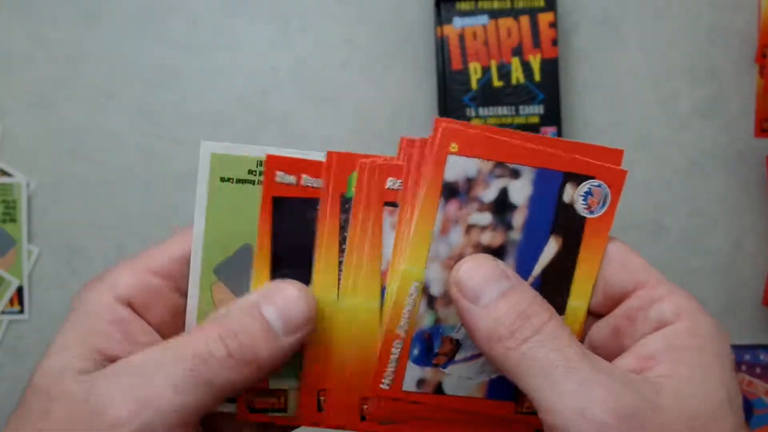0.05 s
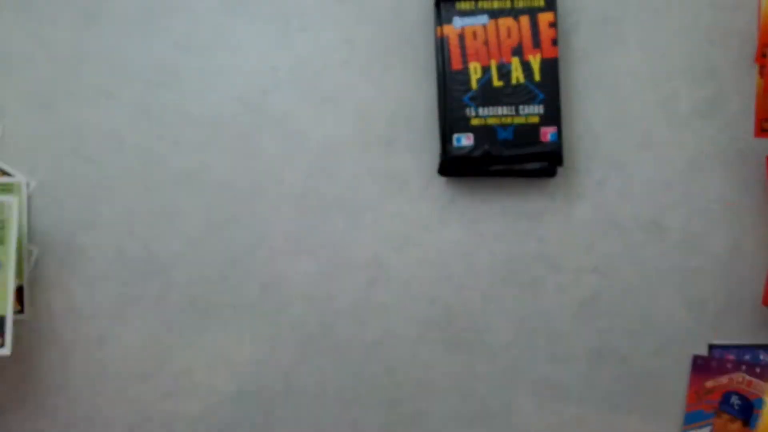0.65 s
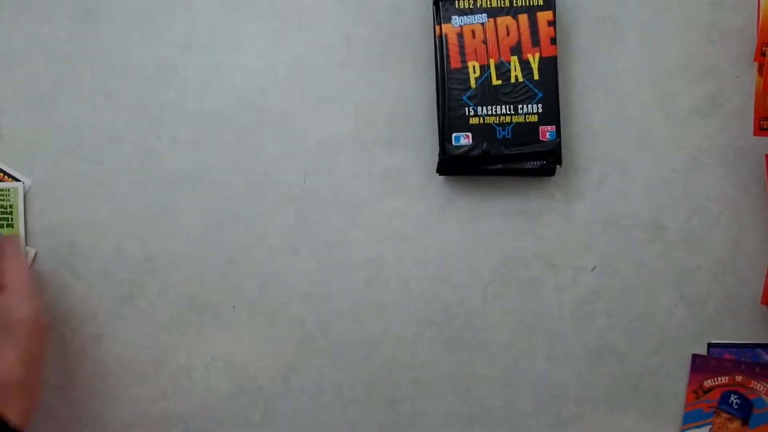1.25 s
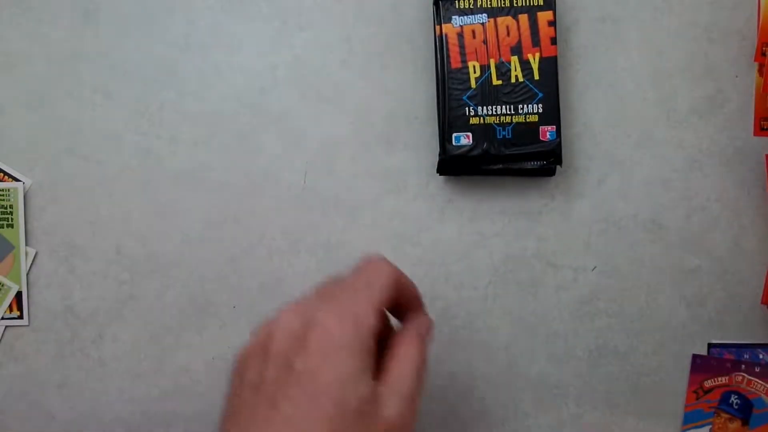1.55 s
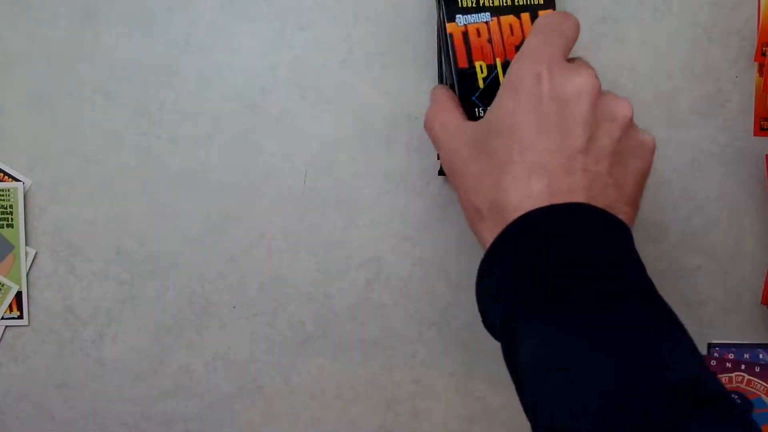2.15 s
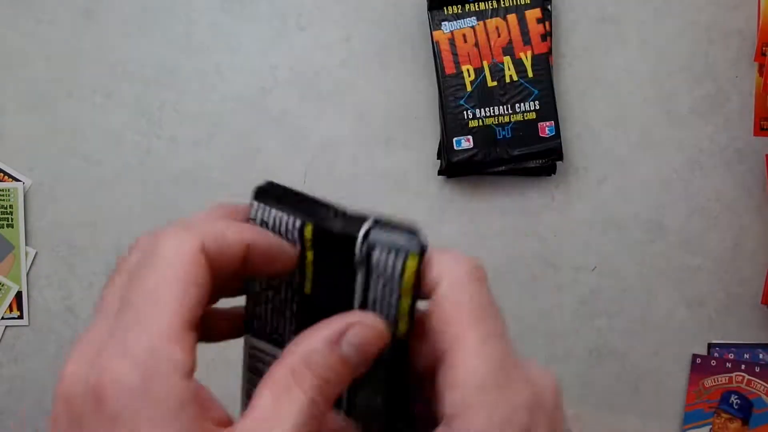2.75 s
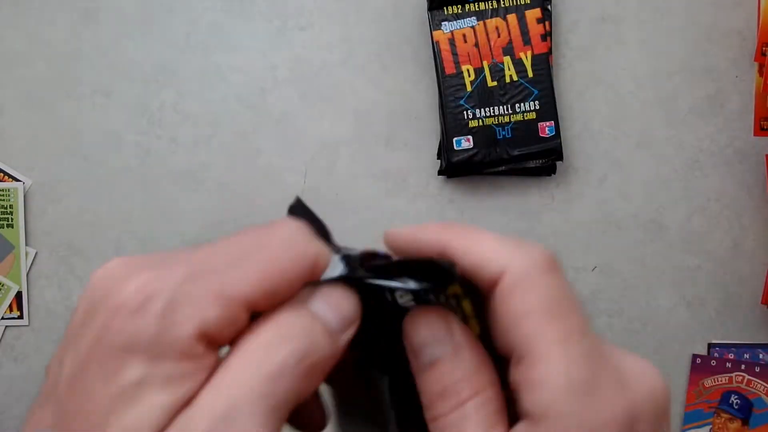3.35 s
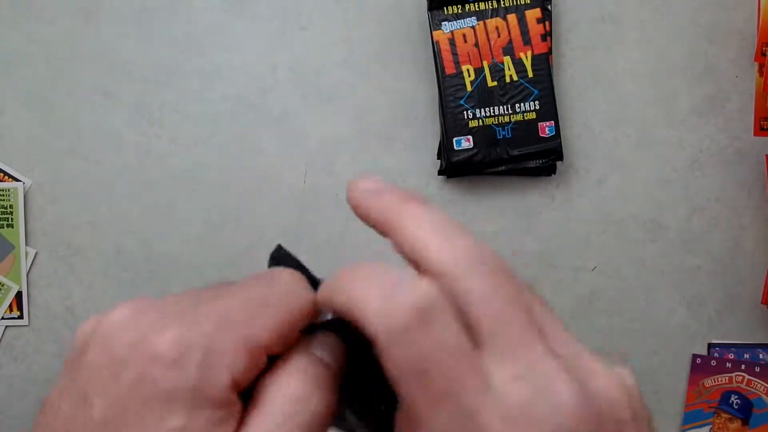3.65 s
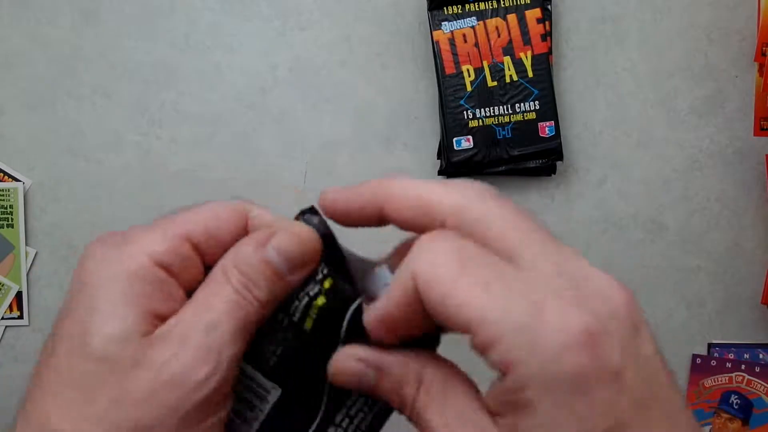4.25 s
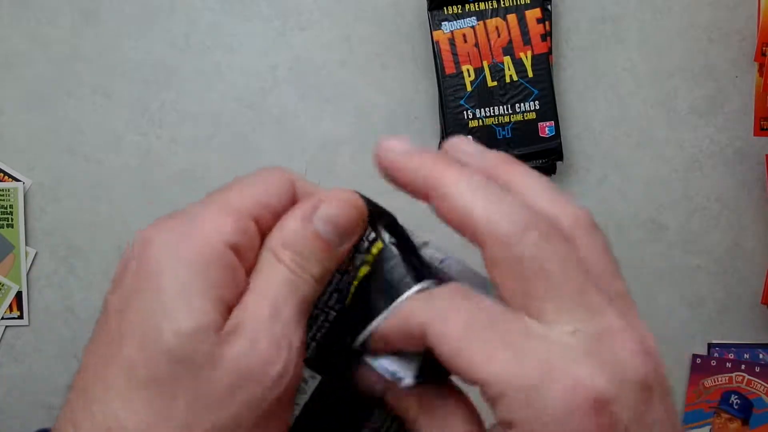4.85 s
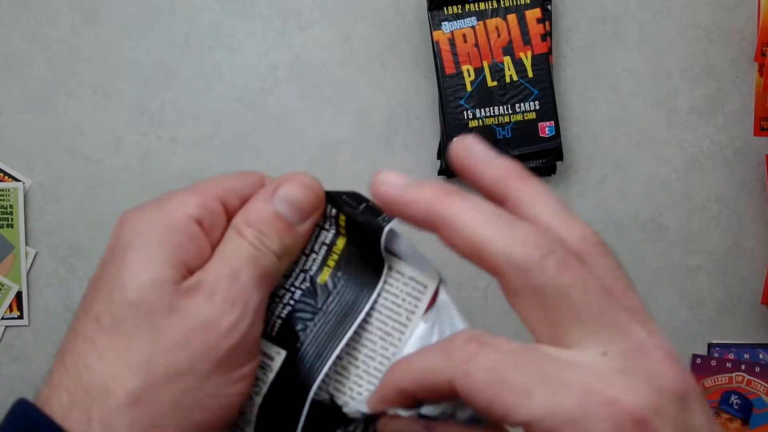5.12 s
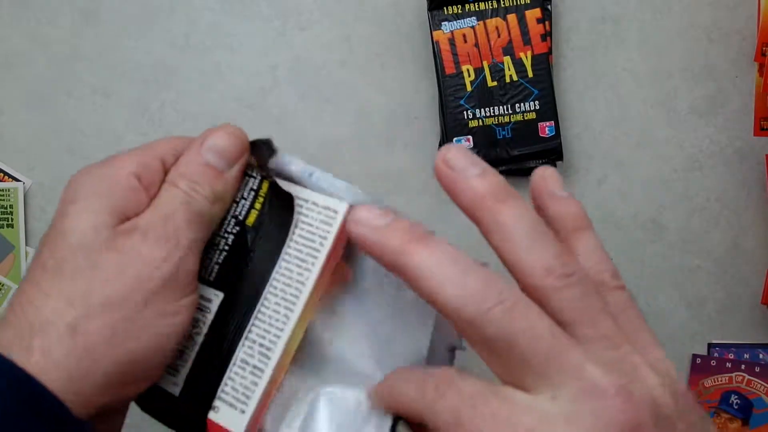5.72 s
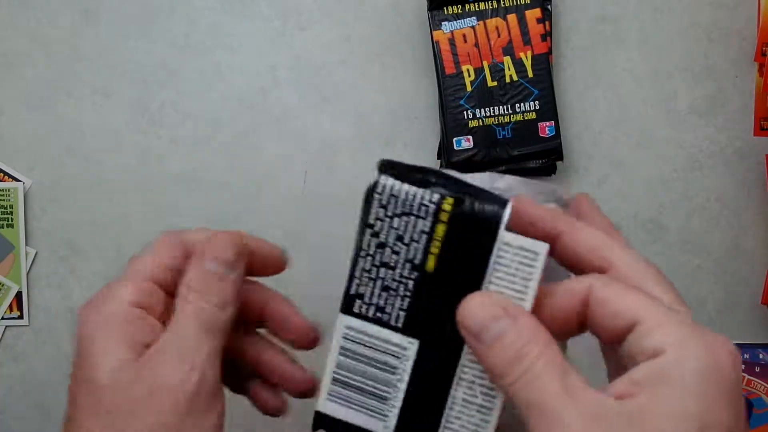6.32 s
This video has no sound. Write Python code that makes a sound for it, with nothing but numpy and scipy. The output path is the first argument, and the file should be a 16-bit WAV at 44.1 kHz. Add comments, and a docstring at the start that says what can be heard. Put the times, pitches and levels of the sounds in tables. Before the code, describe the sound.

Trading cards slide and flick, then a foil pack is peeled open with sharp snaps and crinkling, close by over a faint room hum.

```python
"""First you hear trading cards slide apart in two hands, their edges flicking as they are laid down.
A hand brushes and bumps the table, lightly taps a foil pack, picks it up, pinches it and peels it open.
As it opens, foil creases buckle with sharp snaps over a fine crackle of bending film.
It all happens close by in a small room, over a faint rumble, hiss and low hum."""
import sys
import numpy as np
from scipy import signal
from scipy.fft import rfft, irfft
from scipy.io import wavfile
from scipy.ndimage import uniform_filter1d

SR = 44100
rng = np.random.default_rng(int(sys.argv[2]) if len(sys.argv) > 2 else 0)


def int16_out(signal):
    """Quantize to a 16-bit WAV file."""
    q = np.round(np.clip(np.atleast_2d(signal).T, -1, 1) * 32767)
    wavfile.write(sys.argv[1], SR, q.astype(np.int16))


N = 290178
TIME = np.arange(N) / SR
SIZE = 8192  # samples in one short sound or filter
AGE = np.arange(SIZE) / SR  # seconds since a short sound began
FREQ = np.maximum(np.arange(SIZE // 2 + 1) * SR / SIZE, 1)
BODY_HZ, TREBLE_HZ = 1480, 6010  # "body" lies below the first, "treble" above the second

# how strongly a thin sheet of foil or card sounds at each pitch: pitch_hz, level_db
SHEET_TONE = [(71, -35.5), (120, -10.5), (226, -15.5), (409, -4), (501, -4), (769, -3), (1230, -7),
              (1360, -8), (1780, -4.5), (3020, -3.5), (9290, -5.5), (14900, -3.5), (15800, -10.5)]


def wrapper(low_hz=480):
    """A finger taps the pack lightly; then creases crackle and snap as the foil bends and peels open."""
    # each pull on the foil: start_s, swell_s, fade_s, level_db, body_db, treble_db
    pulls = [(2.531, 0.017, 0.034, -41, -16, 5), (2.75, 0.022, 0.095, -46.5, 4, -1),
             (2.82, 0.022, 0.011, -31, 3.5, 0.5), (2.892, 0.023, 0.034, -28.5, -16, -10.5),
             (3.04, 0.011, 0.084, -38.5, -9, 3), (3.15, 0.063, 0.036, -33, -4.5, -5),
             (3.24, 0.041, 0.024, -34, 4, 7), (3.32, 0.072, 0.1, -31, 1, 1.5),
             (3.45, 0.036, 0.023, -28, -1.5, -0.5), (3.62, 0.097, 0.11, -46.5, -2, -4),
             (3.71, 0.052, 0.085, -44.5, 0, -0.5), (4.16, 0.024, 0.1, -40, -2, -4),
             (4.231, 0.064, 0.13, -28.5, -1, 2), (4.329, 0.072, 0.039, -25.5, 0.5, -3.5),
             (4.658, 0.11, 0.19, -36.5, -6.5, -1.5), (4.76, 0.082, 0.075, -33.5, 5, 2),
             (4.92, 0.06, .08, -34, -6, -1), (4.98, 0.068, 0.076, -22.5, -1.5, -4.5),
             (5.06, 0.021, 0.016, -28, 2, 12), (5.15, .05, 0.19, -42.5, -4, -1.5),
             (5.255, .02, .13, -32, 6.5, 1.5), (5.33, 0.051, 0.06, -32, -4.5, -8),
             (5.391, 0.072, 0.092, -27, -3, -5.5), (5.46, 0.044, 0.13, -24, -4, -8),
             (5.52, 0.076, 0.034, -18, 2.5, 3), (5.685, 0.057, 0.091, -39.5, -0.5, -4),
             (5.759, 0.056, 0.11, -33, -3, -1), (5.85, 0.081, 0.05, -45, 7, 5),
             (5.99, 0.079, 0.3, -41, 0, -0.5), (6.07, 0.03, 0.15, -39.5, -4, 6),
             (6.15, 0.084, 0.027, -35.5, -3.5, -7), (6.302, 0.061, 0.0067, -37.5, 1, 1),
             (6.488, 0.032, 0.14, -37.5, -5, -1.5)]
    # two light finger taps on the pack, then foil creases snapping:
    # start_s, level_db, pitch_hz, treble_db, crack_share (0-1)
    taps_and_snaps = [(1.93, -50.5, 3970, -15, 0.1), (1.975, -50, 2960, -3, .2),
                      (2.42, -46.5, 5850, -2.5, 0.17), (2.551, -25.5, 4160, -1, 0.15),
                      (2.554, -22, 4100, 3, 0.21), (2.574, -30.5, 1280, -8, 0.23),
                      (2.776, -40.5, 1440, -14, 0.22), (2.8347, -23, 4560, 4.5, 0.8),
                      (2.877, -22.5, 7800, -4.5, 0.24), (2.917, -24, 6440, 14, .5),
                      (2.990, -44.5, 3790, -9, 0.6), (3.014, -30.5, 2510, -13, 0.41),
                      (3.046, -27.5, 3100, 11, 0.33), (3.0575, -25, 3300, 2, 0.43),
                      (3.206, -34.5, 2020, -15, 0.2), (3.264, -38, 3770, -1, .3),
                      (3.293, -32.5, 5000, 3, 0.5), (3.3205, -19.5, 3000, 1.5, 0.16),
                      (3.379, -24.5, 4130, 7, 0.26), (3.3883, -20.5, 4300, 4, 0.6),
                      (3.411, -22, 3620, -2.5, 0.46), (3.460, -23.5, 2970, 3, 0),
                      (3.478, -22.5, 3570, -10, 0.88), (3.568, -50.5, 3150, -27, 0.05),
                      (3.6605, -46.5, 4850, -13, .2), (3.689, -31, 2960, -3, .2),
                      (3.779, -40, 3970, 15, 0.2), (3.826, -35.5, 3860, -6, 0.14),
                      (3.837, -35, 3680, -8, 0.16), (3.905, -40, 2800, 4, 0.04),
                      (3.935, -37.5, 2360, -12, 0.08), (3.961, -34.5, 2820, 0, 0.23),
                      (4.0114, -34.5, 5500, -6.5, 0.02), (4.076, -36, 6300, 6.5, .2),
                      (4.138, -45, 2730, -8, 0.03), (4.164, -29.5, 4200, -7, 0.43),
                      (4.1875, -34.5, 2360, -3, 0.2), (4.268, -25.5, 3400, -8, 0.76),
                      (4.279, -22.5, 3320, -24, 0.54), (4.300, -23, 2300, -10, 0.22),
                      (4.3115, -29, 3440, -5, 0), (4.3765, -23.5, 3630, 1, .05),
                      (4.3895, -21.5, 2670, -10, 0.29), (4.401, -26, 2800, -2, .05),
                      (4.434, -20.5, 3730, -5.5, 0.4), (4.528, -35.5, 6200, 5.5, 0.2),
                      (4.581, -38.5, 4500, 3, 0.07), (4.677, -34.5, 3900, 6, 0.02),
                      (4.695, -29.5, 7200, 3, 0.14), (4.719, -31, 4800, -1, 0.4),
                      (4.777, -27.5, 1520, 1, 0), (4.7845, -24, 3500, -6, 0.5),
                      (4.828, -22, 4930, -9, 0.21), (4.875, -23, 4020, -4, 0.42),
                      (4.920, -27.5, 2700, -7.5, 0.2), (4.932, -31.5, 2390, 2, 0.06),
                      (5.005, -19.5, 3440, -12, .2), (5.0257, -25, 3400, -4, 0),
                      (5.042, -15.5, 1950, 4.5, 0.11), (5.079, -21, 3870, 0, 0.17),
                      (5.0897, -17, 1370, -4, 0.21), (5.128, -35, 5700, -1, 0.4),
                      (5.166, -45, 3380, -15, 0.6), (5.215, -36.5, 4130, -15, .3),
                      (5.2593, -23, 4170, -1, 0.22), (5.2657, -24.5, 4200, -18, 0.94),
                      (5.2895, -24.5, 3840, -1.5, 0.05), (5.331, -36, 3270, -10, 0.7),
                      (5.3646, -29.5, 3430, -2, 0.07), (5.398, -19, 2500, 0.5, 0.21),
                      (5.446, -23.5, 2300, -7, 0.2), (5.473, -24.5, 2980, -4, 0.2),
                      (5.556, -21.5, 3060, 0, 0.07), (5.580, -20.5, 1640, -3, 0.07),
                      (5.626, -28.5, 980, -8, 0.17), (5.671, -43, 3500, -3, 0.2),
                      (5.683, -28, 2820, 9, 0.13), (5.700, -35, 830, -20, 0.13),
                      (5.790, -28.5, 4270, 1, 0.11), (5.812, -32.5, 5580, 2, 0.55),
                      (5.831, -31.5, 1970, -17, 0.38), (5.945, -25, 4140, -3, 0.26),
                      (5.997, -25.5, 3160, -6, .4), (6.088, -28.5, 1310, -23, 0.15),
                      (6.201, -30.5, 4500, 6, 0), (6.2256, -27.5, 4280, 6, 0.07),
                      (6.2805, -36, 8060, -7.5, 0.1), (6.356, -17, 4030, 1, 0.32),
                      (6.525, -39, 2510, -5, 0)]
    # the more foil hangs free, the better it gives off low notes: time_s, low_gain_db
    opening = [(2.5, 3.5), (3.6, -5.5), (4.3, -1.5), (4.9, -1), (5.5, -4), (5.85, 13), (6.1, -1),
               (6.58, 6.5)]
    crackle = tiny_slips(per_s=750, spread_db=3, hiss_db=-12.5, crack_share=0.33, ring_db=12.5,
                         ring_width=0.26, overtone_db=4, decay_s=0.097, patches=10)
    foil = rub(colour(crackle, tone_curve(SHEET_TONE) + hollow()), pulls, swell_db=11.5)
    foil += snaps(taps_and_snaps, base_body_db=2, ring_db=7.5, ring_width=0.36, overtone_db=4,
                  decay_s=0.061, room_db=-23, room_s=0.18, creak_db=-8.5, creak_s=0.0015)
    lows = one_side(foil, low_hz, "low")
    return foil + (gain(over_time(opening)) - 1) * lows


def cards():
    """Card faces rub with a fine, dense grain, and their edges flick."""
    # one stack sliding over another: start_s, swell_s, fade_s, level_db, body_db, treble_db
    slides = [(0, 0.077, 0.14, -31, -5, -3), (0.211, 0.057, 0.059, -36.5, 4.5, -4),
              (.29, 0.05, 0.28, -41.5, 3.5, 1), (.42, 0.067, .11, -39, 5, -2), (.55, .03, 0.14, -56, 2, 6),
              (.9, 0.042, .15, -49.5, 3, -1), (.97, .11, 0.023, -36.5, 10.5, -4),
              (1.15, 0.022, 0.07, -48, 16.5, 4)]
    # edges flicking: start_s, level_db, pitch_hz, treble_db, crack_share (0-1)
    flicks = [(.35, -40.5, 4030, -12, 0.03), (.483, -41.5, 1470, -9, 0.04), (.911, -48, 1490, -19, 0),
              (.984, -43.5, 2400, -9, .05), (1.028, -41, 2010, -8, 0.2), (1.05, -31.5, 3400, -12, 0),
              (1.0835, -25.5, 3630, -11, 0.25), (1.0865, -22, 1820, -12, 0.55)]
    # the tone of rubbing card: pitch_hz, level_db
    card_tone = [(88, -34), (150, -18.5), (327, -15.5), (532, -13.5), (587, -9), (883, -13.5),
                 (1160, -20.5), (2900, -1), (3260, -6), (4370, -8), (14900, -7), (15800, -8.5)]
    friction = tiny_slips(per_s=3500, spread_db=4, hiss_db=-0.5, crack_share=0.2, ring_db=14.5,
                          ring_width=0.94, overtone_db=6, decay_s=0.031, patches=8)
    tone = tone_curve(card_tone) + hollow() - 1.5 * peak(pitch_hz=2900, width_hz=700)
    edges = snaps(flicks, base_body_db=-1.5, ring_db=10, ring_width=0.28, overtone_db=2,
                  decay_s=0.058, room_db=-24.5, room_s=0.28, creak_db=-6, creak_s=0.0025)
    return rub(colour(friction, tone), slides, swell_db=18) + edges


def snaps(events, base_body_db, ring_db, ring_width, overtone_db, decay_s, room_db, room_s,
          creak_db, creak_s):
    """Foil or card that is tapped, bent or flicked creaks briefly, then clicks and rings at one pitch."""
    out = np.zeros(N)
    sheet = tone_curve(SHEET_TONE) + hollow()
    body = 1 / (1 + (FREQ / BODY_HZ) ** 4)
    treble = 1 / (1 + (TREBLE_HZ / FREQ) ** 4)
    noises = rng.standard_normal((len(events), 2, SIZE))
    for (start_s, level_db, pitch_hz, treble_db, crack_share), (noise, strain) in zip(events, noises):
        # big, low patches that give way softly have the most body; small sharp ones have almost none
        body_db = base_body_db + 2.5 * np.log2(3360 / pitch_hz) - 33 * crack_share
        ring = ring_db * peak(pitch_hz, ring_width * pitch_hz) + overtones(overtone_db) * (1 - body)
        tone = sheet + body_db * body + treble_db * treble + ring
        snap = colour(crack(noise, crack_share, decay_s, room_db, room_s), tone)
        creak = normalise(colour(strain, tone)) * np.exp(-AGE[::-1] / creak_s)
        add(out, start_s, gain(level_db) * snap / start_level(snap))
        add(out, start_s - SIZE / SR, gain(level_db + creak_db) * creak)  # ends as the snap begins
    return out


def crack(noise, share, decay_s, room_db, room_s, chirp_s=0.0002864, swell_s=0.0011):
    """A sharp pulse takes a share of the energy; the rest scatters through the sheet and the room."""
    share = np.clip(share, 0.01, 0.9)
    # a fold that gives way without a sharp crack swells more slowly
    swell = 1 - np.exp(-AGE / (swell_s * np.exp(-10 * share)))
    tail = noise * swell * (fade(decay_s) + gain(room_db) * fade(room_s))
    # high notes cross a bending sheet faster, so the pulse is a tiny falling chirp
    pulse = irfft(np.exp(-4j * np.pi * chirp_s * np.sqrt(FREQ * TREBLE_HZ)))
    return np.sqrt(share) * pulse / start_level(pulse) + np.sqrt(1 - share) * tail / start_level(tail)


def tiny_slips(per_s, spread_db, hiss_db, crack_share, ring_db, ring_width, overtone_db, decay_s,
               patches):
    """Tiny slips of unequal size ring patches of different pitch, over a smooth rubbing hiss."""
    energy_kept = np.exp(-2 * np.log(1000) / (decay_s * SR))  # from one sample to the next
    swarm = 0
    for pitch_hz in np.geomspace(1180, 11100, patches):
        sizes = gain(spread_db * np.minimum(rng.exponential(size=N), 3.2))
        slips = (rng.random(N) < per_s / patches / SR) * sizes
        # every slip scatters its energy into a short tail of its own
        tail_energy = signal.lfilter([1 - energy_kept], [1, -energy_kept], slips ** 2 + 1e-18)
        tails = np.sqrt(tail_energy) * rng.standard_normal(N)
        patch = np.sqrt(crack_share) * slips + np.sqrt(1 - crack_share) * tails
        tone = ring_db * peak(pitch_hz, ring_width * pitch_hz) + overtones(overtone_db)
        swarm += normalise(colour(patch - patch.mean(), tone))
    swarm = normalise(swarm) + gain(hiss_db) * rng.standard_normal(N)
    # the hand feeds in energy steadily, so the level is evened out over 30 ms
    return swarm / np.sqrt(uniform_filter1d(swarm ** 2, size=1323))


def overtones(depth_db, spacing_hz=190, blur_hz=11000):
    """A crumpled patch has its own uneven overtones, which blur together high up (dB at each FREQ)."""
    lifts = rng.standard_normal(size=512)
    ripple = np.interp(FREQ / spacing_hz, np.arange(len(lifts)), lifts)
    return depth_db * ripple / (1 + (FREQ / blur_hz) ** 2)


def rub(friction, strokes, swell_db):
    """Play a rubbing sound in strokes, each with its own body and treble; overlaps add in power."""
    body = one_side(friction, BODY_HZ, "low")
    treble = one_side(friction, TREBLE_HZ, "high")
    bands = np.array([body, friction - body - treble, treble])
    band_shares = np.mean(bands * friction, axis=1)
    power = np.zeros((3, N))
    for start_s, swell_s, fade_s, level_db, body_db, treble_db in strokes:
        balance = gain([body_db, 0, treble_db]) ** 2
        loudness = gain(level_db) * stroke(start_s, swell_s, fade_s, swell_db)
        power += np.outer(balance / (balance @ band_shares), loudness ** 2)
    return np.sum(bands * np.sqrt(power), axis=0)


def stroke(start_s, swell_s, fade_s, swell_db, grip_s=0.0039):
    """One rub takes hold, builds by swell_db, then drops 20 dB in fade_s and keeps fading."""
    age = np.maximum(TIME - start_s, 0)
    rise = np.maximum(1 - age / swell_s, 0)
    fall = np.maximum((age - swell_s) / fade_s, 0)
    level_db = -swell_db * rise - 20 * fall ** 1.056  # the fade speeds up as the fingers stop
    return (1 - np.exp(-age / grip_s)) * gain(np.maximum(level_db, -120))


def table_bumps(scuff_hz=1100, scuff_s=0.074, press_s=0.0012):
    """A soft push makes the table top ring; the touch adds a short, dull scuff."""
    # soft blows on the table: start_s, thud_db, contact_s, scuff_db
    bumps = [(1.493, -33.5, 0.0055, -39), (2.29, -29, 0.0026, -32.5)]
    # the notes the table top rings at: pitch_hz, relative_db, decay_s
    table_notes = [(62, -28, .12), (92.2, 9.5, 0.14), (163, -6.5, 0.2), (200, -11, 0.07), (278, -3, 0.076),
                   (339, 8, 0.062), (422, 5.5, 0.038), (684, 8, 0.052), (900, -16, 0.046), (1230, -21, .04)]
    out = np.zeros(N)
    press = 1 - np.exp(-AGE / press_s)
    ring = sum(gain(db) * np.sin(2 * np.pi * hz * AGE) * fade(decay_s) for hz, db, decay_s in table_notes)
    scuff_tone = hollow() - 10 * np.log10(1 + (FREQ / scuff_hz) ** 2)
    for start_s, thud_db, contact_s, scuff_db in bumps:
        thud = signal.fftconvolve(ring, fade(contact_s))[:SIZE] * press
        scuff = colour(rng.standard_normal(SIZE) * press * fade(scuff_s), scuff_tone)
        add(out, start_s, gain(thud_db) * thud / start_level(thud))
        add(out, start_s, gain(scuff_db) * scuff / start_level(scuff))
    return out


def hand():
    """Skin and cloth brush the table with a soft, even hiss."""
    # sweeps of hand and sleeve: start_s, swell_s, fade_s, level_db, body_db, treble_db
    brushes = [(1.23, 0.024, .2, -52.5, 4, -3), (1.29, .028, 0.056, -50.5, 4, 4),
               (1.36, 0.05, 0.11, -39.5, -2, 2.5), (1.467, 0.023, 0.02, -32, 4.5, -6),
               (1.5, .02, 0.37, -58, 19, 2), (1.9, 0.023, 0.38, -54, -1, -3),
               (2.02, 0.022, 0.5, -57.5, -9, 3), (2.44, .08, 0.97, -56.5, 9, 4)]
    hiss = colour(rng.standard_normal(N), tone_curve(SHEET_TONE) + hollow())
    return rub(hiss, brushes, swell_db=16)


def hollow():
    """The space between hands, table and microphone lifts some pitches and weakens others (in dB)."""
    # the peaks and dips of that space: pitch_hz, width_hz, lift_db
    resonances = [(355, 130, 5), (540, 110, -6), (790, 90, 3), (900, 70, 3.5), (1030, 90, -2),
                  (1350, 130, 6), (1525, 70, 3), (1640, 100, -2.5), (2010, 90, 3), (2560, 130, 2.5),
                  (2720, 100, -3.5), (2960, 100, 2.5), (3430, 90, 2)]
    return sum(lift_db * peak(pitch_hz, width_hz) for pitch_hz, width_hz, lift_db in resonances)


def background(hum_hz=120, hum_db=-9):
    """The room's low rumble and faint hiss, with a hum from the mains power."""
    # the tone of the rumble and hiss: pitch_hz, relative_db
    room_tone = [(13, -48), (22, -16.5), (55, -5), (92, -4), (118, -7.5), (178, -16.5), (241, -18.5),
                 (277, -19.5), (418, -21.5), (566, -21.5), (632, -23.5), (954, -24.5), (1190, -22.5),
                 (1610, -27.5), (15800, -35.5)]
    # the background sinks for a while and returns: time_s, level_db
    room_level = [(0, -55), (3.25, -55), (3.6, -69), (4.15, -61.5), (4.9, -53.5), (5.3, -60), (6.58, -52.5)]
    freq = np.maximum(np.arange(N // 2 + 1) * SR / N, 1)
    air_spectrum = rfft(rng.standard_normal(N)) * gain(tone_curve(room_tone, freq))
    air = normalise(irfft(air_spectrum, N))
    hum = normalise(np.sin(2 * np.pi * hum_hz * TIME))
    return gain(over_time(room_level)) * (air + gain(hum_db) * hum)


def gain(db):
    """Turn decibels into a number to multiply by."""
    return 10 ** (np.asarray(db) / 20)


def normalise(x):
    """Scale a sound to an average (rms) level of 1."""
    return x / np.sqrt(np.mean(x ** 2))


def start_level(x):
    """The average (rms) level of the first 8 ms."""
    return np.sqrt(np.mean(x[:SR // 125] ** 2))


def over_time(points):
    """Join (time_s, value) points with straight lines."""
    return np.interp(TIME, *np.transpose(points))


def tone_curve(points, freq=FREQ):
    """Join (pitch_hz, level_db) points to give a level at every frequency."""
    pitch_hz, level_db = np.transpose(points)
    return np.interp(np.log(freq), np.log(pitch_hz), level_db)


def peak(pitch_hz, width_hz):
    """A bump of height 1 around one pitch, shaped like a resonance."""
    return 1 / (1 + (2 * (FREQ - pitch_hz) / width_hz) ** 2)


def fade(decay_s):
    """Start at 1 and die away by 60 dB every decay_s."""
    return np.exp(-np.log(1000) * AGE / decay_s)


def colour(x, tone_db):
    """Filter by tone_db at each FREQ, so that nothing rings before it is struck (minimum phase)."""
    cepstrum = irfft(np.log(gain(tone_db)))
    cepstrum[1:SIZE // 2] *= 2
    cepstrum[SIZE // 2 + 1:] = 0
    response = irfft(np.exp(rfft(cepstrum)))
    return signal.fftconvolve(x, response)[:len(x)]


def one_side(x, edge_hz, side):
    """Keep the "low" or the "high" side of edge_hz."""
    return signal.sosfiltfilt(signal.butter(2, edge_hz, side, fs=SR, output="sos"), x)


def add(out, start_s, sound):
    """Mix a sound in at start_s."""
    i = int(start_s * SR)
    out[i:i + len(sound)] += sound[:N - i]


def scene():
    """All the sounds reach one microphone, the same in both channels."""
    return np.tile(cards() + hand() + wrapper() + table_bumps() + background(), (2, 1))


def record(dry):
    """A steep filter cuts the highest treble, above 16000 Hz."""
    return signal.sosfilt(signal.ellip(10, 0.1, 70, 16000, fs=SR, output="sos"), dry)


dry = scene()
out = record(dry)
int16_out(out)
```